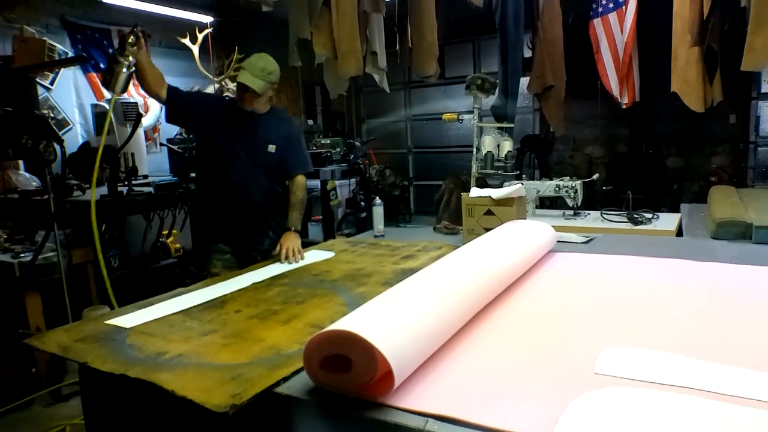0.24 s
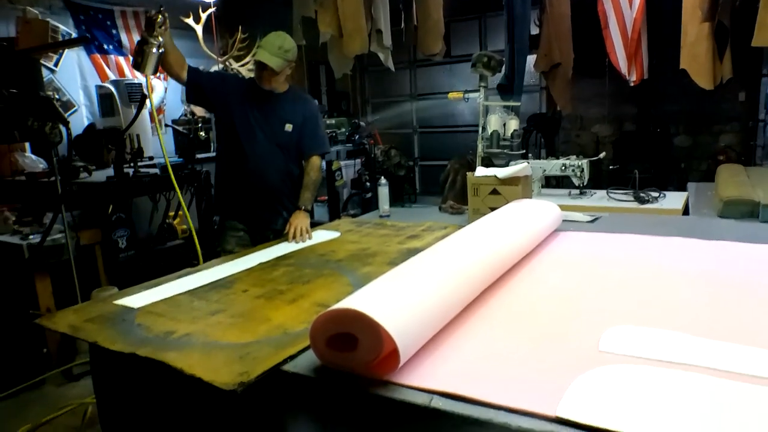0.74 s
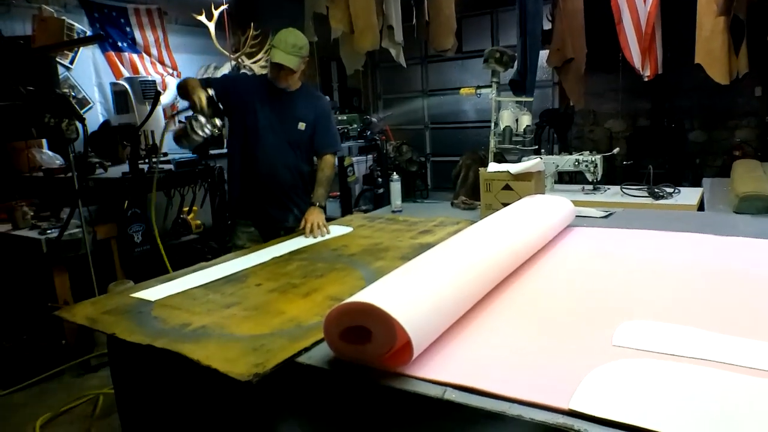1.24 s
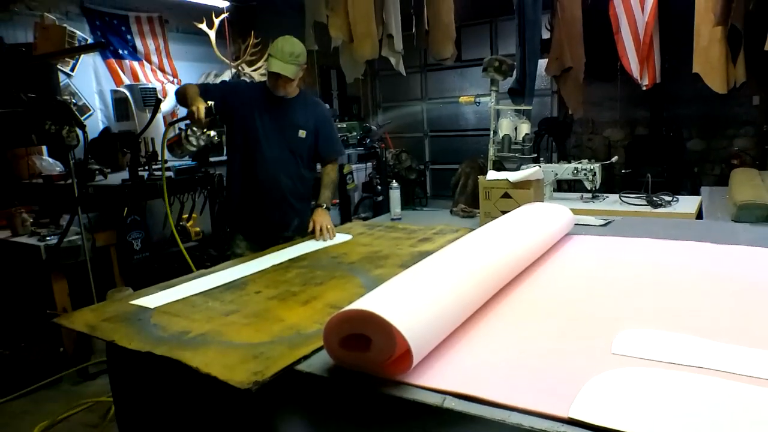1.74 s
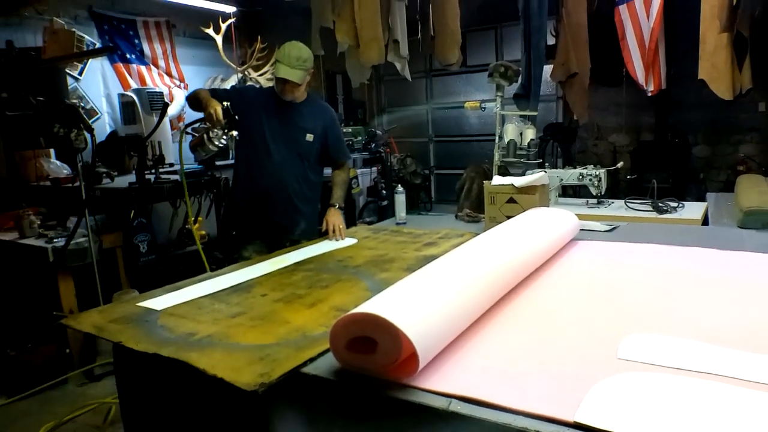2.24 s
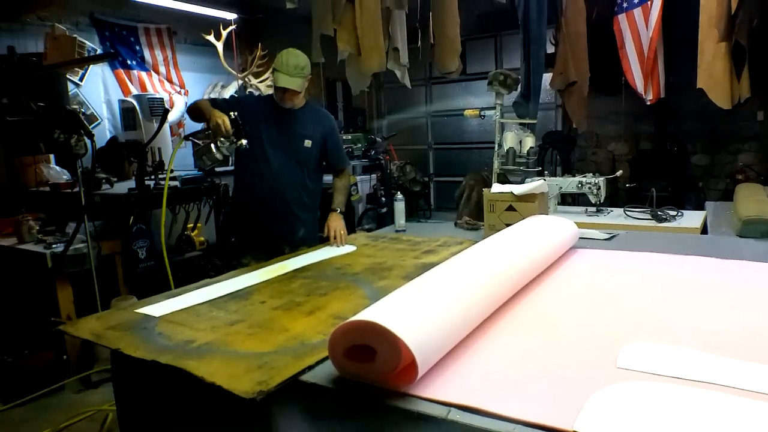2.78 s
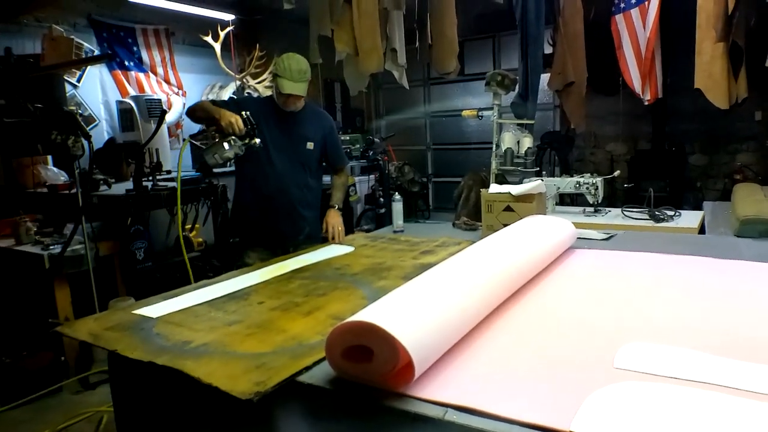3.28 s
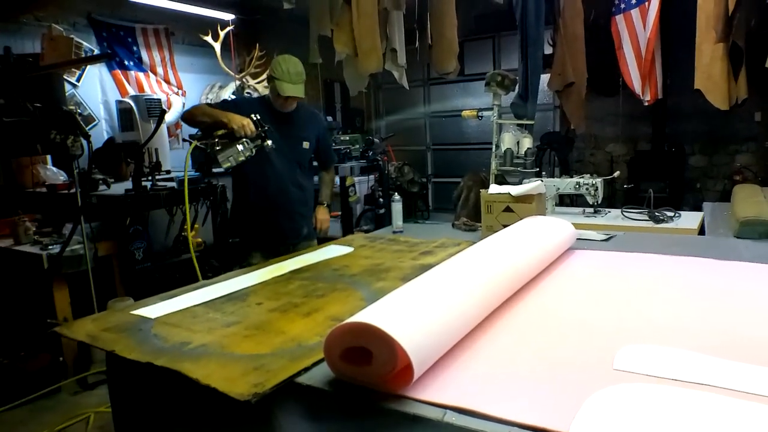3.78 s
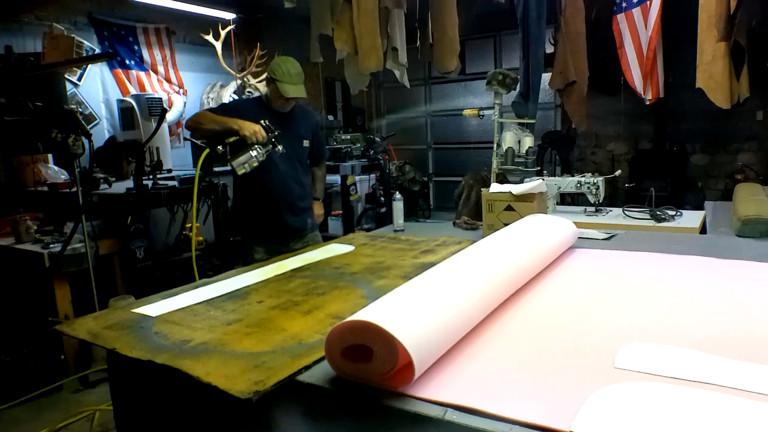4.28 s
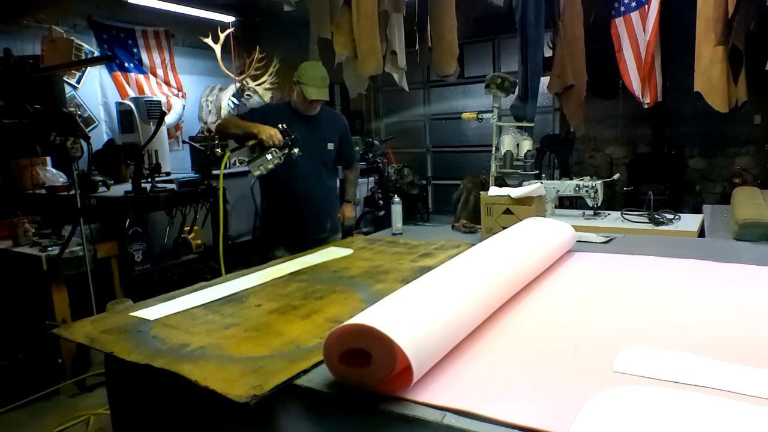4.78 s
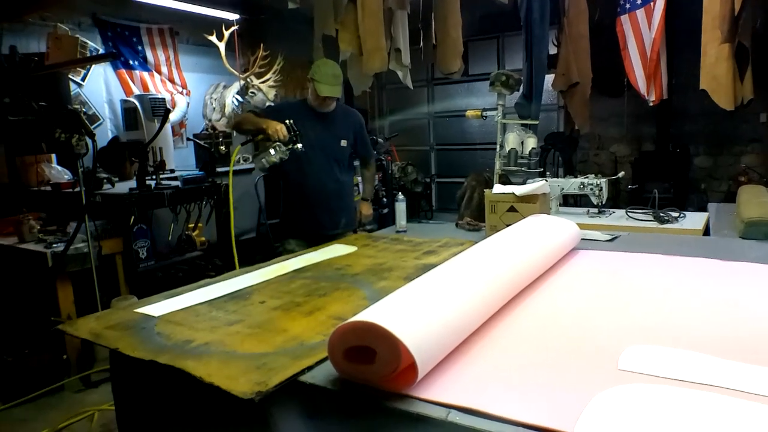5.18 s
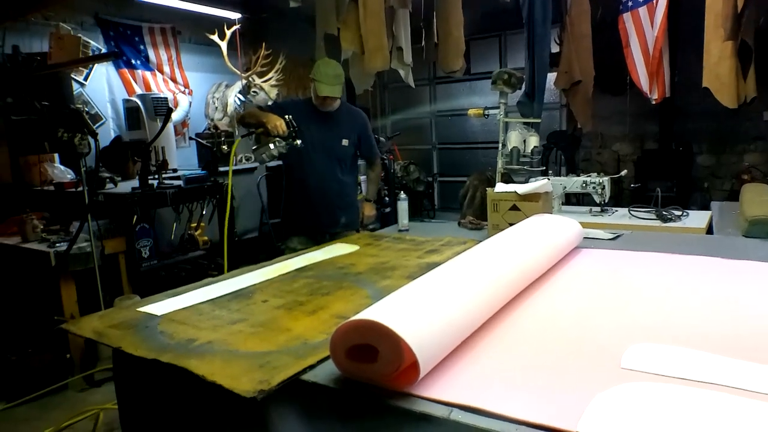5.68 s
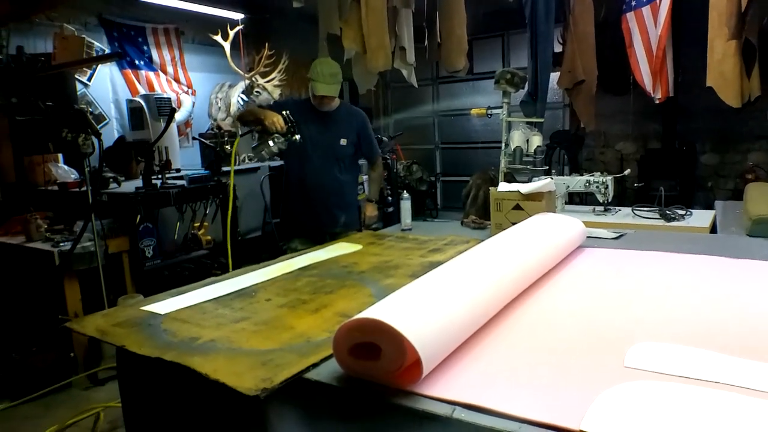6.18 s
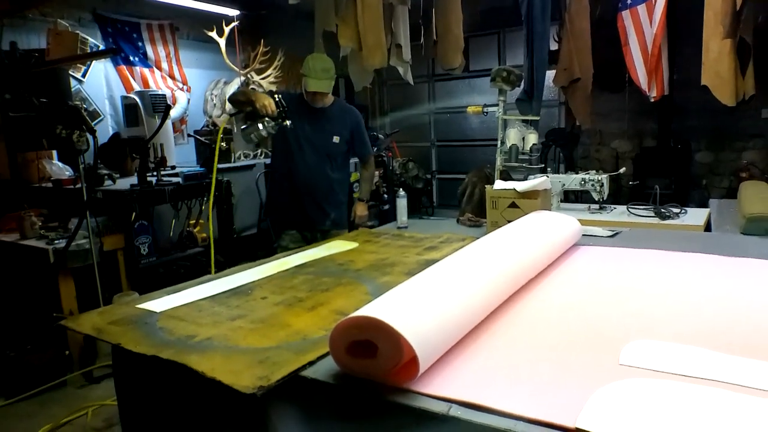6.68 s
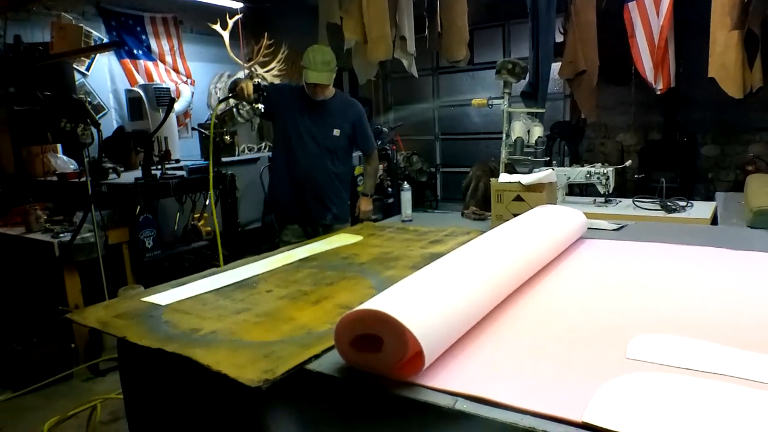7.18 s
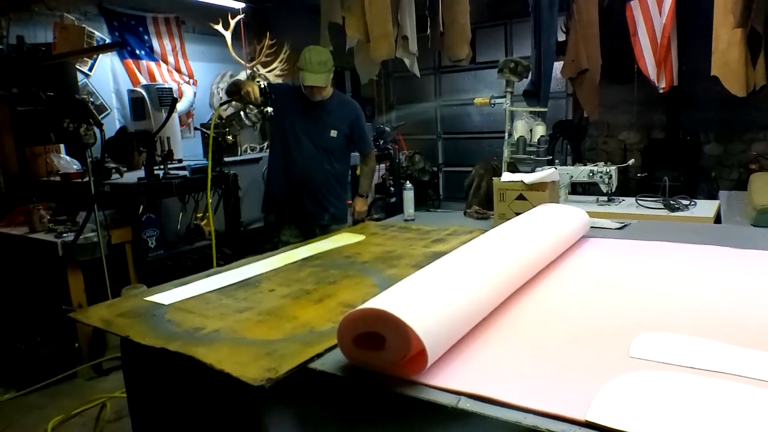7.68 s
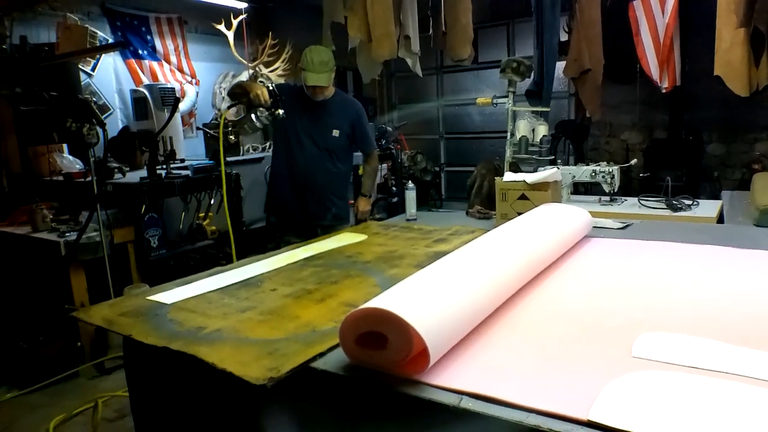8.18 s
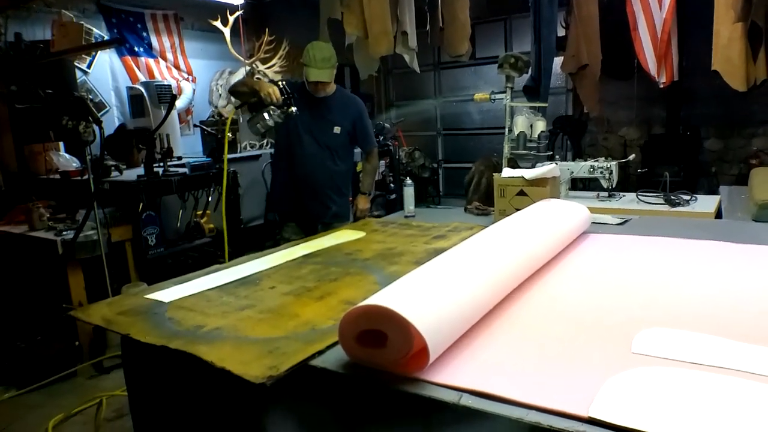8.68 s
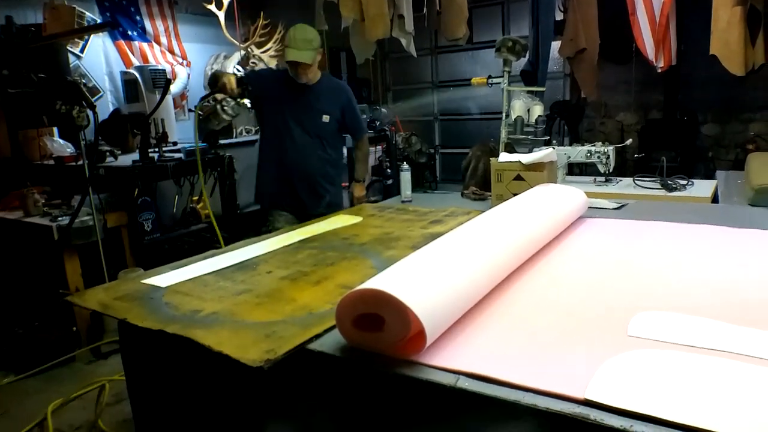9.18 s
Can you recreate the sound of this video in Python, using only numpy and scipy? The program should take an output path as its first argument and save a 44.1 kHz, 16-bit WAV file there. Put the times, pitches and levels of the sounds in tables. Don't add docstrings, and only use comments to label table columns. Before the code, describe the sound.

From 0 to 1.3 seconds a workshop is quiet: a low, swaying building boom, faint fading murmur of far machines, a tiny metal clink at the very start, and fainter ticks and dull rings around 0.2 to 0.7 and 1.2 seconds. At 1.3 a compressed-air spray gun snaps open, swelling to full pressure within a few hundredths of a second. A very loud, dense, bright hiss then runs unbroken to the end, around 9.4 seconds, with nozzle resonances and subtle shifts of tone as the gun sweeps. Low, uneven drumming on a hollow table underlies it, strongest near 2 and 3.2 seconds, weakening later. Soft low air puffs grow more evident after 8 seconds, when the hiss sometimes loses body. The single small camera microphone, a few metres away, is overloaded: compressed, dull at the extreme top, with patchy thin fizz and split-second thinning.

```python
import sys
import numpy as np
from scipy import signal
from scipy.fft import rfft, irfft, next_fast_len
from scipy.io import wavfile
from scipy.ndimage import uniform_filter1d, minimum_filter1d, map_coordinates

SR = 44100
rng = np.random.default_rng(int(sys.argv[2]) if len(sys.argv) > 2 else 0)


def how_loud(loudness_db):
    steps = np.asarray(loudness_db, float) / 20
    return 10 ** steps


def wav_out(sig):
    wavfile.write(sys.argv[1], SR, np.round(np.clip(np.atleast_2d(sig).T, -1, 1) * 32767).astype(np.int16))


N = 416039
T = np.arange(N) / SR
BLOCK = 2048
TRIGGER_S = 1.3165

# frequency in Hz, density in dB per Hz.
BOOM_SPECTRUM = [(60, -45), (95, -16), (122, -13), (146, 0), (162, -9), (205, -4), (245, -13), (310, -24),
                 (430, -60)]
# frequency in Hz, density in dB per Hz.
MURMUR_SPECTRUM = [(180, -20), (260, 4), (376, -4), (595, -5), (619, 4), (645, -8), (800, -8), (1100, -12),
                   (1500, -18), (2100, -22), (2600, -19), (3100, -26), (7000, -27), (11100, -32),
                   (14500, -66)]
# frequency in Hz, density in dB per Hz.
DRAUGHT_SPECTRUM = [(8, -32), (16, -12), (38, -2.5), (48, -5), (60, -4), (80, -15), (110, -21), (160, -45)]
# peak in seconds, level in dB.
PUFFS = [(.02, -51), (1.33, -44), (1.86, -48), (2.3, -44), (2.55, -46), (3.05, -41), (3.2, -39), (3.7, -44),
         (4.05, -46), (4.59, -44), (4.9, -44), (5.59, -45), (5.91, -44), (6.3, -44), (6.7, -42),
         (6.98, -41), (7.5, -44), (7.82, -41), (8.33, -36), (8.5, -39), (8.72, -34), (8.92, -34),
         (9.05, -41), (9.38, -37)]
# start in seconds, pitch
# in Hz, level in dB, 60 dB decay in seconds.
SHORT_RINGS = [(0, 2650, -60, .07), (.006, 4750, -66, .08), (0, 1100, -62, .06), (.7, 1700, -70, .22),
               (.71, 1550, -74, .15), (.68, 7000, -80, .2), (.69, 2750, -82, .1), (.2, 620, -68, .5),
               (.35, 620, -68, .6), (1.23, 620, -69, .2), (.36, 2600, -78, .15), (.48, 2650, -78, .15),
               (1.2, 2600, -79, .1)]
# frequency in Hz, density in dB per Hz.
TABLE_SPECTRUM = [(80, -30), (110, -11), (140, -4), (153, -8), (172, -0.5), (192, -7), (215, -3),
                  (260, -10), (330, -10), (600, -20), (900, -50)]
# time in seconds, drumming level in dB.
DRUMMING = [
    (1.42, -47.5),
    (1.85, -47.5),
    (1.98, -42),
    (2.3, -48),
    (3.15, -37),
    (3.55, -43),
    (5.3, -46),
    (7.3, -51.5),
    (9.43, -52),
]
# time in seconds, hiss level in dB, share of jet striking the table in dB,
# nozzle turned to the microphone in dB.
GUN_SWEEP = [(1.42, -10.8, -14.5, -9), (1.65, -10, -13.5, -11.3), (1.98, -10.5, -14, -9.6),
             (2.54, -10.3, -11.5, -9.4), (3.1, -10.3, -12.5, -11), (3.6, -10.8, -13, -10),
             (4.6, -11.3, -14, -11), (5.1, -10.8, -12.5, -11), (5.9, -11.3, -13, -11.3),
             (6.35, -10.6, -15.5, -11.3), (6.65, -10.7, -13.5, -10.8), (7.28, -10.5, -15, -8.8),
             (8.0, -10.8, -14.5, -10.4), (8.13, -11.2, -22.5, -11), (8.56, -10.5, -15.5, -11.2),
             (8.68, -10.5, -22, -10.2), (9.0, -10.2, -19.5, -11), (9.3, -10.2, -18.5, -8)]
# frequency in Hz, density in dB per Hz.
JET_SPECTRUM = [(150, -56), (300, -30), (600, -20), (1000, -10), (1950, -15), (2500, -5), (3900, -13),
                (4500, -1), (7700, -4), (8900, -11), (11100, -8), (14500, -44)]
# frequency in Hz, width in Hz, level in dB.
NOZZLE_RINGS = [(362, 30, -5), (455, 30, -5), (535, 40, -7), (750, 40, -10), (845, 40, -7), (1015, 55, -5),
                (1190, 45, -6), (1605, 50, -2), (2500, 400, .3), (3560, 220, -4.5), (4480, 200, -3),
                (5200, 380, -2), (7200, 200, -4), (7750, 560, 0), (9900, 520, -5), (10700, 250, -6)]
ECHO_DELAYS = [
    .00593,
]
# centre in seconds, length in seconds, share lost from 0 to 1.
THINNED = [(.122, .014, .6), (1.06, .012, .55), (1.105, .01, .5), (1.756, .023, 1), (1.872, .01, .95),
           (1.915, .008, .88), (2.534, .009, .9), (3.065, .009, .88), (4.304, .01, .92), (5.605, .011, .94),
           (8.101, .012, .82)]
# start in seconds, length in seconds.
FIZZ_SPELLS = [(1.416, .157), (1.595, .262), (1.875, .805), (2.725, .193), (3.056, .2), (3.28, .28),
               (3.633, .05), (3.801, .025), (3.908, .094), (4.091, .039), (4.26, .03), (4.575, .027),
               (4.88, .025), (5.018, .083), (5.227, .032), (5.36, .025), (5.632, .088), (5.836, .05),
               (5.982, .064), (6.164, .116), (6.446, .029), (6.532, .166), (6.761, .067), (7.113, .3),
               (7.438, .4), (7.939, .102), (8.222, .43), (8.73, .038), (8.973, .21), (9.293, .123)]
# frequency in Hz, density in dB per Hz.
FIZZ_SPECTRUM = [(11500, -60), (11700, -1), (15700, 0), (15900, -60)]


def spectra(x):
    return signal.stft(x, SR, nperseg=BLOCK, noverlap=3 * BLOCK // 4)


def wave(lines):
    return signal.istft(lines, SR, nperseg=BLOCK, noverlap=3 * BLOCK // 4)[1][:N]


def unit(x):
    return x / np.sqrt(np.mean(x ** 2))


def along(table, s, column=1):
    rows = np.array(table)
    return np.interp(s, rows[:, 0], rows[:, column])


def colour_db(table, hz):
    rows = np.array(table)
    return np.interp(np.log(hz + 1), np.log(rows[:, 0]), rows[:, 1], -80, -80)


def coloured(table):
    size = next_fast_len(N)
    lines = rfft(rng.standard_normal(size))
    gain = how_loud(colour_db(table, np.fft.rfftfreq(size, 1 / SR)))
    return unit(irfft(lines * gain, size)[:N])


def patches(place, s, rate, order=1):
    field = rng.standard_normal((400, 512))
    rows, cols = np.meshgrid(np.clip(place, 0, 398), np.clip(rate * s, 0, 510), indexing="ij")
    return map_coordinates(field, [rows, cols], order=order) * 1.4


def sway(rate):
    return patches(np.zeros(1), T, rate)[0]


def shop():
    duck_db = -3.5 * trigger()
    boom = coloured(BOOM_SPECTRUM) * how_loud(-52 + 2.5 * sway(9.0) + duck_db)
    hz, s, lines = spectra(coloured(MURMUR_SPECTRUM))
    murmur = wave(lines * how_loud(2.5 * patches(hz / 150, s, 9.0)))
    fade_db = 1.8 * np.minimum(T, TRIGGER_S)
    return boom + murmur * how_loud(-65.5 - fade_db)


def draught():
    stirred_db = 1.05 * np.clip(T - TRIGGER_S, 0, None)
    level = how_loud(-53.5 + stirred_db + 3.0 * sway(12.0))
    for t, db in PUFFS:
        width_s = np.where(T < t, .04, .06)
        level = level + how_loud(db) * np.exp(-((T - t) / width_s) ** 2)
    return coloured(DRAUGHT_SPECTRUM) * level


def clinks():
    out = np.zeros(N)
    span = 2 * SR
    for t, hz, db, t60 in SHORT_RINGS:
        s = np.clip(T[:span] - t, 0, None)
        rough = 1 + 4.8 * uniform_filter1d(rng.standard_normal(span), size=60)
        out[:span] += how_loud(db - 60 * s / t60) * np.sin(2 * np.pi * hz * s) * rough
    return out


def table_drum():
    return coloured(TABLE_SPECTRUM) * how_loud(along(DRUMMING, T) + 3.8 * sway(15.0))


def trigger():
    since = T - TRIGGER_S
    opening = how_loud(np.clip(since * 2600, -60, 0)) * (since > -.0108)
    swell_s = .017
    return opening * (1 - .64 * np.exp(-np.clip(since, 0, None) / swell_s))


def jet():
    hz, s, lines = spectra(rng.standard_normal(N))
    body = how_loud(colour_db(JET_SPECTRUM, hz) - 0.5)
    rings = sum(how_loud(db) ** 2 / (1 + (2 * (hz - f) / w) ** 2) for f, w, db in NOZZLE_RINGS)
    steady = np.sqrt(body ** 2 + rings * np.clip(hz / 900, 0, 1) ** 4)

    strike_db = along(GUN_SWEEP, s, column=2) + 14.2
    low_db = np.clip(np.log2(2200 / (hz + 1)) / 1.1, 0, 1.7)[:, None] * strike_db
    shelf_db = -1.5 + .3 * (along(DRUMMING, s) + 44)
    low_db = low_db + np.clip((700 - hz) / 150, 0, 1)[:, None] * shelf_db
    top_db = np.clip((hz - 8000) / 900, 0, 1)[:, None] * (along(GUN_SWEEP, s, column=3) + 9)

    flicker_db = (.65 + 950 / (hz + 150))[:, None] * patches(4.0 * np.log2(hz / 50 + 1), s, 15.0)
    walls_db = 2.4 * patches(hz / 40, s, 10.0)
    stretch = 1 + .004 * np.sin(0.61 * s)
    echoes = sum(np.exp(-2j * np.pi * np.outer(hz, d * stretch)) for d in ECHO_DELAYS)
    ripple = np.abs(1 + .35 * echoes / (1 + (hz[:, None] / 2500) ** 2))

    moving = how_loud(low_db + top_db + flicker_db + walls_db) * ripple
    hiss = unit(wave(lines * steady[:, None] * moving))
    return hiss * how_loud(along(GUN_SWEEP, T) + 1.1)


def scene():
    background = shop() + draught() + clinks()
    mono = background + trigger() * (table_drum() + jet())
    return np.array([mono, mono])


def narrow_band(x):
    hz, s, lines = spectra(x)
    cut_db = -.075 * np.clip(hz - 11000, 0, None)
    lines = lines * how_loud(cut_db)[:, None]
    power = np.abs(lines) ** 2
    ratio = np.sqrt(power / (uniform_filter1d(power, size=260, axis=0) + 1e-18))
    strongest = wave(lines * np.where(ratio > 1.8, how_loud(4), how_loud(-30)))
    lost = sum(share * np.clip(2 - np.abs(T - t) / length * 2, 0, 1) for t, length, share in THINNED)
    return (1 - lost) * wave(lines) + lost * strongest


def limiter(x, top=.99):
    room = np.minimum(1, top / (np.abs(x) + 1e-9))
    return x * uniform_filter1d(minimum_filter1d(room, size=65), size=61)


def fizz():
    hz, s, lines = signal.stft(coloured(FIZZ_SPECTRUM), SR, nperseg=BLOCK // 4)
    turn_db = along(GUN_SWEEP, s, column=3) + 10.5
    passed = patches(np.zeros(1), s, 43.0, order=0)[0] + .6 * turn_db > -.75
    spells = 0
    for t, length in FIZZ_SPELLS:
        inside = (s > t + .004) & (s < t + length - .004)
        spells = spells + (inside & (passed | (length < .17)))
    bands = patches(hz / 700, s, 43.0, order=0) > ((13300 - hz) / 2000 - .35)[:, None]
    gain = bands * spells * how_loud(-46.6 + 1.2 * turn_db)
    return signal.istft(lines * gain, SR, nperseg=BLOCK // 4)[1][:N]


def roll_off(x):
    return signal.sosfilt(signal.butter(12, 15850, fs=SR, output="sos"), x)


def record(dry):
    mono = limiter(narrow_band(dry[0])) + fizz()
    return roll_off(np.array([mono, mono]))


dry = scene()
out = record(dry)
wav_out(out)
```